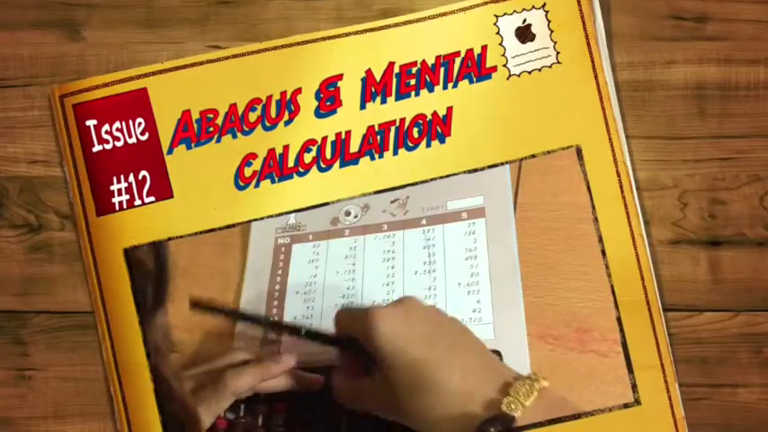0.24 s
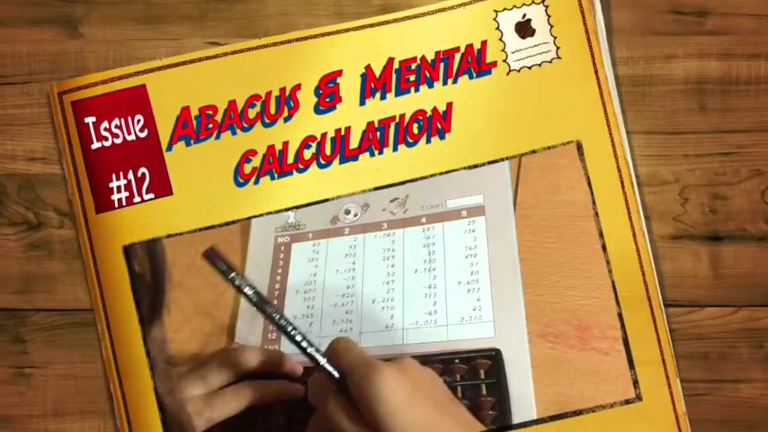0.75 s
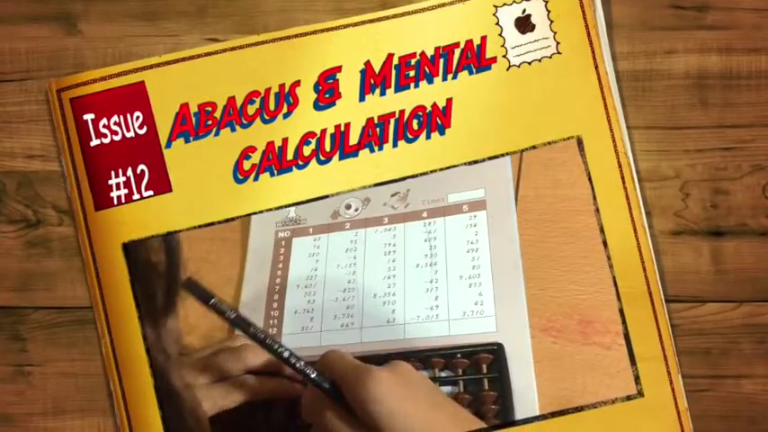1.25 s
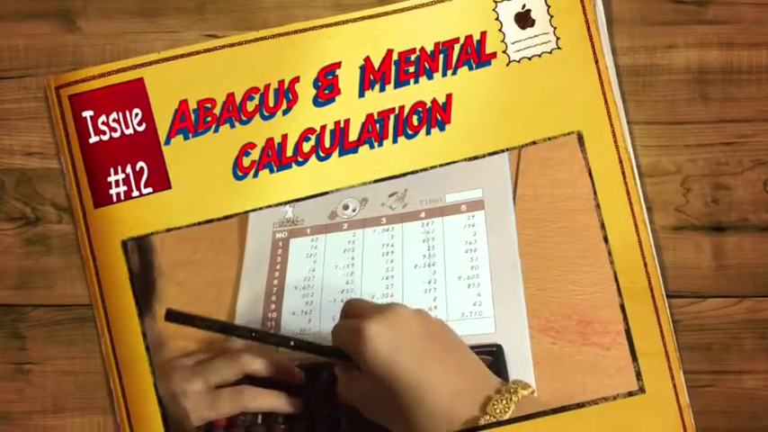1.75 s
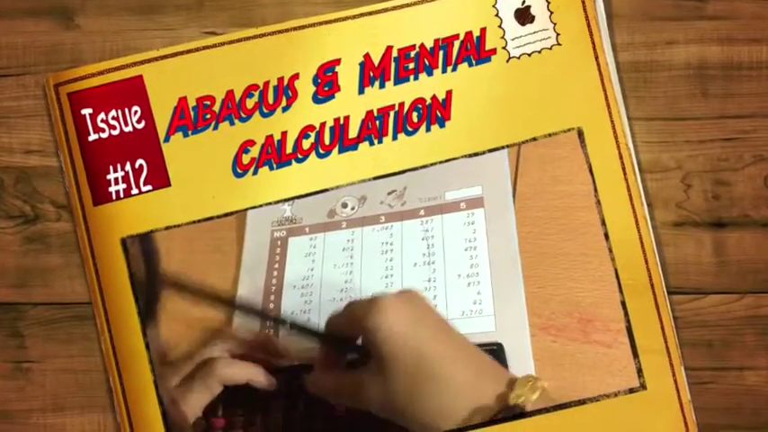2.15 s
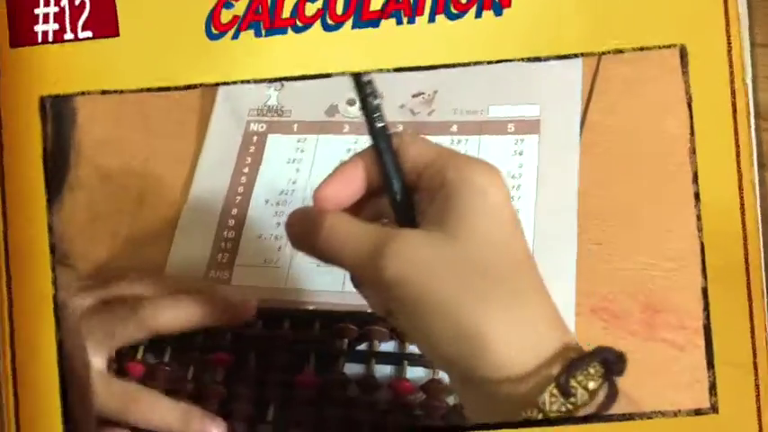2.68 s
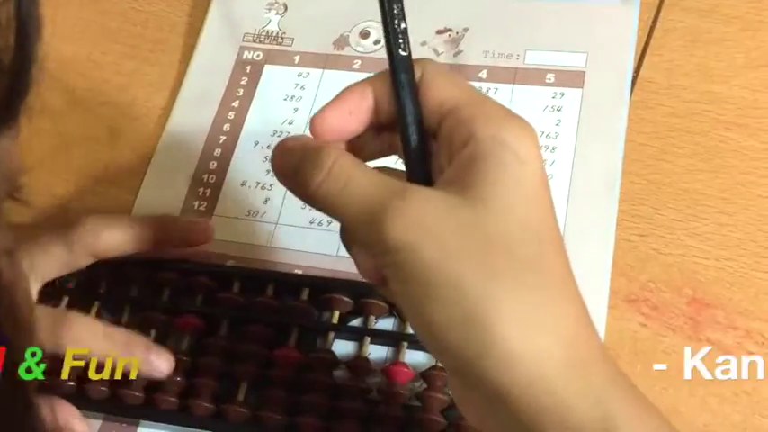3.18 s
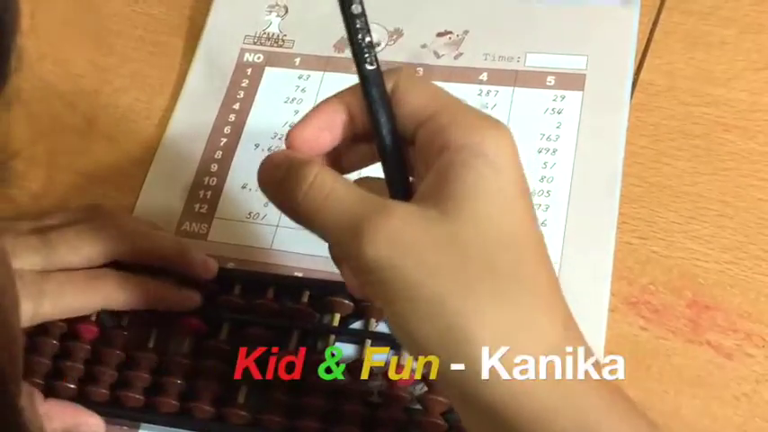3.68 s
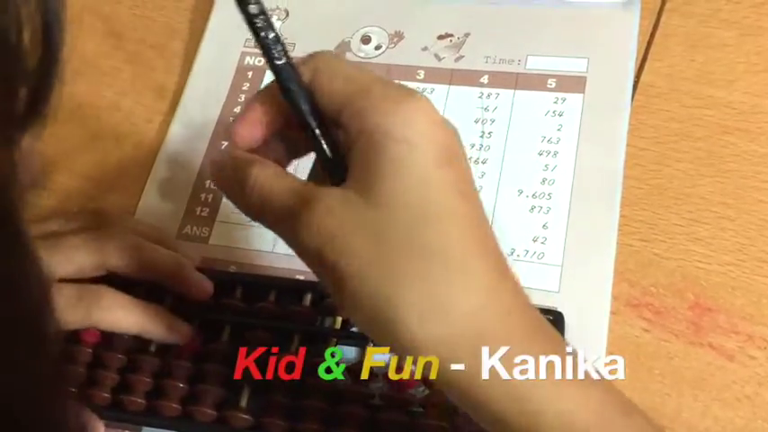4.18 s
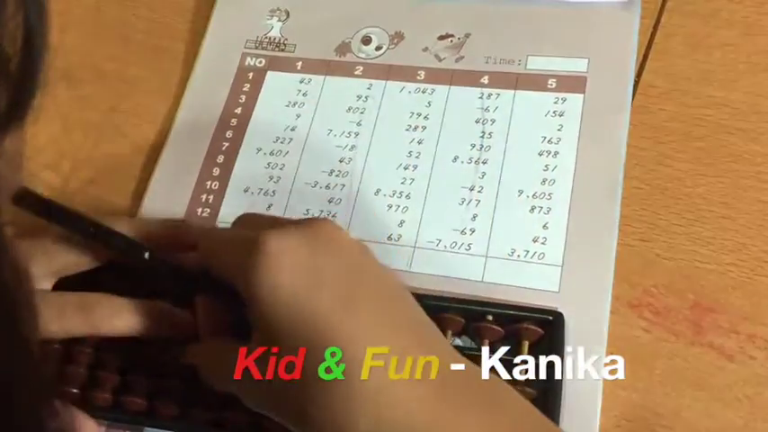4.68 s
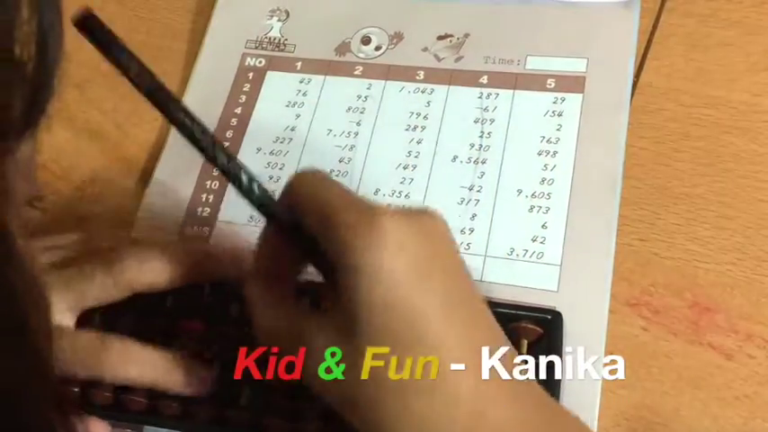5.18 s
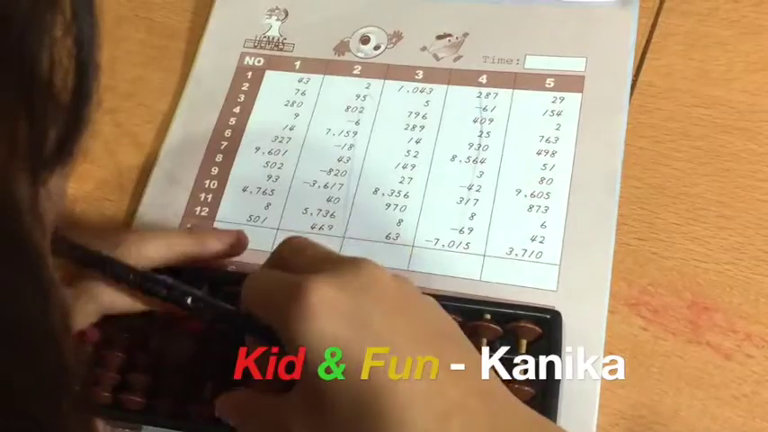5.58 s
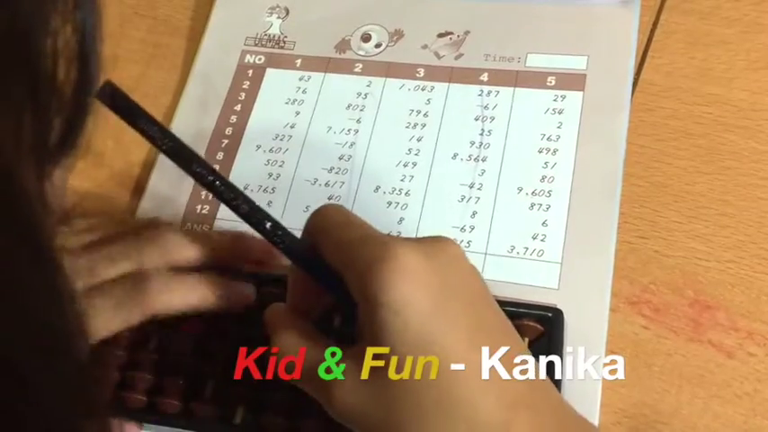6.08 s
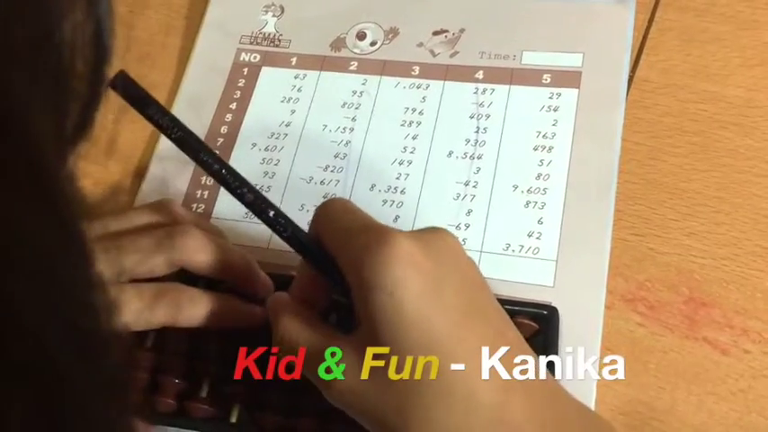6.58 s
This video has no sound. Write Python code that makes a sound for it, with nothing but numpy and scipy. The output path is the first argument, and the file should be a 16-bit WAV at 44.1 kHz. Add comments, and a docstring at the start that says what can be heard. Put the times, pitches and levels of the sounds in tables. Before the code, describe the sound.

A small furnished room heard close up, in mono, about seven seconds. A faint fan whines around 455 Hz with a gentle throb, over low hum, soft room noise and rumble. A fading rattle and desk bumps open; a bright bead clack snaps at 0.26, with small ticks following. Dull hand thuds continue, the strongest boom near 0.9. A very hard clack hits at 1.3 and rattles away; a double strike lands at 1.93, with lighter clicks until 2.2. Soft bumps come around 2.4, then mostly background with barely audible ticks until 3.7. Irregular clicks resume, stronger at 4.1, 4.4 and 4.65, with a sharp cluster at 4.9 to 5.0. Another dense clatter runs from 5.63 to 5.8. After a lull, a loud snap at 6.55 and a bright, knocking clack at 6.77 finish. Brief gritty scrapes lead into some strikes; echoes are short.

```python
"""A small furnished room: fingers flick hard beads along the rods of a small abacus on a desk, close by.
Each strike is a burst of noise shaped by the ringing of bead, rods and frame; gritty noise swells and fades.
A hand bumps the desk: a dull puff of noise and a long, low ring.
Behind it a fan whines and throbs as close sine tones, over steady hum tones, room noise and rumble."""
import sys
import numpy as np
from scipy import signal
from scipy.fft import rfft, irfft, next_fast_len
from scipy.io import wavfile
from scipy.ndimage import uniform_filter1d, map_coordinates

SR = 44100
rng = np.random.default_rng(int(sys.argv[2]) if len(sys.argv) > 2 else 0)


def transcribe(u):
    """Save the signal u as a 16-bit wav file named by the first command-line argument.

    u: samples, shape (n,) or (channels, n), limited to [-1, 1]; the rate is SR.
    q: integer samples, one column per channel.
    """
    v = np.clip(np.atleast_2d(u).T, -1, 1)
    q = np.round(v * 32767).astype(np.int16)
    wavfile.write(sys.argv[1], SR, q)


N = 301644  # length in samples


def amp(db):
    """Turn dB into a plain multiplier."""
    return 10 ** (np.asarray(db) / 20)


def unit(x):
    """Scale a sound to an rms of 1."""
    return x / np.sqrt(np.mean(x ** 2) + 1e-20)


def along(points, hz):
    """Read a curve of (Hz, value) points, joined by straight lines on a log frequency axis."""
    point_hz, values = np.transpose(points)
    return np.interp(np.log(hz + 1), np.log(point_hz + 1), values)


def filtered(x, response):
    """Multiply the spectrum of x by a response, a function of frequency in Hz."""
    m = next_fast_len(len(x) + 8192)
    hz = np.fft.rfftfreq(m, 1 / SR)
    return irfft(rfft(x, m) * response(hz), m)[:len(x)]


def causal(x, db):
    """Filter x by a gain in dB per FFT bin, with minimum phase so nothing sounds before its cause."""
    cepstrum = irfft(db * np.log(10) / 20)
    half = len(cepstrum) // 2
    cepstrum[1:half] *= 2
    cepstrum[half + 1:] = 0
    return irfft(rfft(x, len(cepstrum)) * np.exp(rfft(cepstrum)))


def noise(spectrum):
    """Coloured noise with an rms of 1."""
    return unit(filtered(rng.standard_normal(N), lambda hz: amp(along(spectrum, hz))))


def add(track, sound, start_s):
    """Mix a sound into the track at a time in seconds, cutting off what runs past the end."""
    rest = track[max(round(start_s * SR), 0):]
    rest[:len(sound)] += sound[:len(rest)]


def reverb(x):
    """Room echoes as a fresh noise tail in which each frequency dies away at its own speed."""
    # How fast the room falls silent. Each row: frequency in Hz, time to fall by 60 dB in seconds.
    decay_times = [(500, .35), (2500, .3), (7000, .3), (14000, 0.22)]
    hz, t, z = signal.stft(rng.standard_normal(SR // 3), SR, nperseg=256)
    fading = amp(-60 * t / along(decay_times, hz)[:, None])
    tail = signal.istft(z * fading, SR, nperseg=256)[1]
    delayed = np.pad(x, (300, 0))  # the echoes start 300 samples late
    return signal.fftconvolve(delayed, tail / np.linalg.norm(tail))


def ringing(hz, least, most):
    """Lift in dB from the abacus's modes: every contact wakes each by a random share, a little off pitch."""
    # Ways the abacus rings. Each row: centre in Hz, width in Hz, lift in dB before the random share.
    modes = [(1104, 190, 9), (1870, 120, 8), (2111, 120, 12.5), (2490, 47, 3.5), (3026, 250, 7.5),
             (4390, 200, 6.5), (4700, 200, -0.5), (5770, 210, 3), (5700, 230, 6), (6330, 86, -1),
             (6770, 450, 7.5), (7500, 200, -0.5), (8330, 180, 6), (9250, 520, 10), (12100, 360, 5.5),
             (13100, 600, 8.5)]
    detune = .015  # typical pitch error, as a fraction
    centre, width, lift_db = (column[:, None] for column in np.transpose(modes))
    share = rng.uniform(least, most, lift_db.shape)
    actual_hz = centre * (1 + detune * rng.standard_normal(centre.shape))
    peaks = 1 / (1 + (2 * (hz - actual_hz) / width) ** 2)
    return (lift_db * share * peaks).sum(axis=0)


def room_air():
    """Steady room noise, strongest in the bass."""
    # Colour of the noise. Each row: frequency in Hz, relative strength per Hz in dB.
    air_colour = [(20, -38), (30, -19.5), (45, -14), (100, -2), (136, -10.5), (250, -14.5), (320, -12.5),
                  (400, -19), (540, -21.5), (1080, -24.5), (2500, -31.5), (5000, -37.5), (10500, -41.5),
                  (13200, -42.5), (15500, -45.5)]
    return amp(-66.5) * noise(air_colour)


def rumble():
    """Low noise whose level wanders up and down in lumps, from 8 random values a second."""
    # Colour of the rumble. Each row: frequency in Hz, relative strength per Hz in dB.
    low_colour = [(20, -40.5), (40, -6.5), (75, 1), (130, -4), (300, -19), (600, -46)]
    lumps = map_coordinates(rng.standard_normal(80), [np.arange(N) * 8 / SR])
    return amp(-79.0 + 4.6 * lumps) * noise(low_colour)


def fan():
    """A motor whine with a weaker tone on either side, which beat as a throb once per turn, and hum."""
    # The drifting whine. Each row: time in seconds, pitch in Hz.
    whine_pitch = [(0, 454.3), (1.4, 455.7), (2.4, 455.7), (5.2, 454.2), (6.84, 454)]
    # The steady hum tones. Each row: frequency in Hz, rms level in dB.
    hum_tones = [(100, -75.5), (164, -83.5), (200, -81.5), (210, -87), (277, -85), (300, -85), (303, -83),
                 (500, -74)]
    t = np.arange(N) / SR
    cycles = np.cumsum(np.interp(t, *np.transpose(whine_pitch))) / SR
    turn = cycles / 35.81 - .21  # 35.81 whine cycles per turn
    whine = amp(-63.5) * np.sin(2 * np.pi * cycles)
    whine += amp(-71.5) * np.sin(2 * np.pi * (cycles + turn))
    whine += amp(-77.5) * np.sin(2 * np.pi * (cycles - turn))
    hum = np.zeros(N)
    for hz, rms_db in hum_tones:
        hum += np.sqrt(2) * amp(rms_db) * np.sin(2 * np.pi * (hz * t + rng.random()))
    return whine + hum


def desk():
    """A hand's soft bump gives a dull puff of noise plus the long low ring of the desk top."""
    # The bumps. Each row: start in seconds, boom level in dB, thud level in dB, thud pitch in Hz.
    bumps = [(0.031, -64, -63.5, 152), (0.158, -59.5, -80, 200), (.445, -69, -65, 200),
             (0.476, -71, -60.5, 250), (.505, -74.5, -66.5, 730), (0.521, -67, -60.5, 211),
             (0.799, -74, -64.5, 350), (.815, -68, -66.5, 730), (.85, -67.5, -59.5, 73),
             (.9, -73, -63, 298), (.922, -49.5, -56.5, 153), (1.312, -65, -76.5, 250),
             (1.951, -60, -69, 250), (2.37, -71.5, -72, 377), (2.431, -64, -59.5, 190),
             (4.77, -71, -65.5, 61), (4.919, -64, -61.5, 75.6), (5.329, -62.5, -74.5, 150),
             (5.702, -62, -73, 198), (6.386, -62, -69, 150), (6.553, -59.5, -64, 248)]
    # Tones of the boom. Each row: frequency in Hz, level within the boom in dB, time to fall 60 dB in s.
    boom_tones = [(112.9, -6, 3.9), (111.35, -1, .45)]
    out, t = np.zeros(N), np.arange(2 * SR) / SR
    boom = np.zeros(len(t))
    for hz, db, t60 in boom_tones:
        boom += amp(db - 60 * t / t60) * np.sin(2 * np.pi * hz * t)
    boom *= 1 - np.exp(-t / 0.0018)  # soft start
    puff_t = t[:SR // 4]
    puff_shape = amp(-60 * puff_t / 0.14) * (1 - np.exp(-puff_t / 0.0053))
    for start_s, boom_db, thud_db, thud_hz in bumps:

        def thud_band(hz):
            """A broad resonance, passed twice."""
            once = 1j * hz * .8 * thud_hz / (thud_hz ** 2 - hz ** 2 + 1j * hz * 0.77 * thud_hz)
            return once ** 2

        puff = filtered(rng.standard_normal(len(puff_t)) * puff_shape, thud_band)
        add(out, amp(thud_db) * puff / np.std(puff[:SR // 30]), start_s)
        add(out, amp(boom_db) * boom, start_s)
    return out


def gritty_noise():
    """Rough noise of uneven loudness, in short swells leading into strikes and in fading rattles."""
    # Short swells of gritty noise leading into a strike.
    # Each row: end in seconds, length in seconds, end level in dB.
    swells = [(0.262, 0.039, -59), (1.308, 0.023, -57), (1.917, .06, -71.5), (2.132, 0.055, -62),
              (4.086, 0.035, -66), (4.649, 0.05, -67), (4.915, 0.032, -61.5), (5.687, .033, -62.5),
              (6.465, 0.017, -68), (6.548, .022, -58.5), (6.772, 0.046, -58)]
    # Fading rattles: the tail of an earlier strike at the start, and one after the strike at 1.31 s.
    # Each row: start in seconds, starting level in dB, brightness in dB per octave.
    rattles = [(0, -63, -3), (1.319, -65, 2.5)]
    # Colour of the grit. Each row: frequency in Hz, relative strength per Hz in dB.
    grit_colour = [(590, -35.5), (1000, -2), (1800, -3), (2970, -4.5), (5790, -7), (7770, -13.5),
                   (13200, -18.5), (15000, -24.5)]
    swell_db, swell_tilt_db = 11, 1.5  # rise along a swell; brightness per octave
    rattle_s, fade_db = .11, 15.5  # length of a rattle; its fall in level
    out = np.zeros(N)
    strokes = []
    for end, length, db in swells:
        strokes.append((end - length, length, db - swell_db, db, swell_tilt_db))
    for start, db, tilt_db in rattles:
        strokes.append((start, rattle_s, db, db - fade_db, tilt_db))
    for start, length, start_db, end_db, tilt_db in strokes:
        n = round(length * SR)
        uneven = amp(2.2 * unit(uniform_filter1d(rng.standard_normal(n), size=60)))

        def colour(hz):
            """Grit colour, tilted in brightness, with the abacus ringing along."""
            tilt = tilt_db * np.log2((hz + 50) / 3000)
            return amp(along(grit_colour, hz) + tilt + ringing(hz, .3, 1.1))

        grit = unit(uneven * filtered(rng.standard_normal(n), colour))
        soft_start = np.minimum(np.arange(n) / (.004 * SR), 1)  # over 4 ms
        add(out, soft_start * grit * amp(np.linspace(start_db, end_db, n)), start)
    return out


def contact_noise(t, chatter_db):
    """A sharp crack, then a longer chatter as the struck beads knock on against their neighbours."""
    crack = amp(-60 * t / .009) * (1 - np.exp(-(t / .0006) ** 2)) * rng.choice([-1, 1], len(t))
    chatter = amp(chatter_db - 60 * t / 0.034) + amp(-29.0 - 60 * t / 0.086)
    uneven = amp(2.5 * unit(uniform_filter1d(rng.standard_normal(len(t)), size=40)))
    chatter_start = 1 - np.exp(-t / 0.00082)
    blows = crack + chatter * uneven * rng.standard_normal(len(t)) * chatter_start
    blows /= np.sqrt(np.mean(blows[:SR // 250] ** 2))
    # level out the random spectrum of the noise burst, so the colour set later decides the tone
    power = np.abs(rfft(blows, 8192)) ** 2
    flatten_db = -10 * np.log10(uniform_filter1d(power, size=260) / power.mean())
    return causal(blows, flatten_db)[:len(t)]


def beads():
    """Each strike is a crack and a short chatter, coloured by bead, rods and frame, with room echoes."""
    # The strikes. Each row: start in seconds, bead level in dB before a common 1.5 dB lift, bead pitch in Hz,
    # then, in dB against the bead, the dull knock of rods and frame and the bright edge.
    strikes = [(0.2586, -36, 4960, 5, 6), (0.3085, -51, 5300, 8, -3), (0.319, -61, 4800, 11, -11),
               (0.3497, -47, 5000, -3, -16.5), (1.1145, -62, 4300, -1, -14), (1.3059, -50, 5500, -7, -4),
               (1.3073, -23.5, 6200, -6.5, -6.5), (1.347, -47, 4870, -0.5, -6),
               (1.3867, -54.5, 5300, 1, -10), (1.4142, -51, 4600, 5, -14), (1.424, -61, 4400, 13.5, -10),
               (1.9179, -50, 5100, 11.5, -10), (1.9318, -33, 4930, -10, -4),
               (1.9493, -28.5, 5270, -7.5, -11.5), (2.0798, -57.5, 4200, -1, -19),
               (2.092, -56, 4300, 3, -22), (2.112, -54, 4900, 2, -23), (2.1303, -46.5, 5700, 5.5, -8.5),
               (2.17, -42, 5100, -6, -17), (2.822, -71.5, 3400, 4.5, -20), (3.0874, -61, 4500, -0.5, -17.5),
               (3.6827, -67.5, 3600, 3.5, -13), (3.7099, -42, 4900, -8.5, -14),
               (3.725, -47.5, 4980, -2.5, -15.5), (3.924, -51, 5100, 1, -11.5),
               (3.9278, -48, 5100, -5, -10), (3.9358, -50.5, 5000, 3, -12), (4.087, -56.5, 5300, 12, -7),
               (4.0895, -37.5, 5380, -4.5, -5.5), (4.096, -47.5, 5200, 4.5, -16.5),
               (4.3582, -49, 5600, 1.5, -11.5), (4.3798, -41, 5600, -8.5, -11.5),
               (4.393, -47, 5500, -4.5, -16), (4.6486, -41.5, 5500, -2, -9.5),
               (4.9136, -33.5, 4900, -4.5, -3.5), (4.9374, -31, 6130, -11, -11),
               (4.965, -48, 5400, 0, -8.5), (5.0022, -53, 3800, 7.5, -15), (5.0069, -44, 4900, -10, -12),
               (5.013, -51, 4400, -1, -13), (5.321, -71, 5000, -5, -14), (5.44, -46.5, 4900, -6, -14),
               (5.5447, -54.5, 6300, 8, -0.5), (5.6322, -57.5, 3800, 2.5, -18),
               (5.6415, -50.5, 4320, -2.5, -22), (5.6912, -33.5, 5700, -7.5, -2),
               (5.716, -41, 5100, -1, -2), (5.719, -38, 4800, 0.5, -8), (5.7521, -52, 4900, -11, -16),
               (5.765, -55, 5000, -6, -22), (5.7712, -41, 5650, -6, -16), (5.7781, -42.5, 4900, -1, -12),
               (5.787, -42, 5600, -5, -15.5), (6.4637, -60, 4300, 4, -15.5), (6.5262, -49, 4240, -0.5, -20),
               (6.5369, -54, 4600, 13, -20), (6.5514, -23.5, 5560, -12, 0.9),
               (6.7288, -65, 4500, 11.5, -14), (6.744, -54.5, 4700, -5, -18), (6.7735, -35.5, 5570, 9, 10)]
    usual_db = -40  # a strike of middling force
    out, t, hz = np.zeros(N), np.arange(SR // 10) / SR, np.fft.rfftfreq(8192, 1 / SR)
    for start_s, bead_db, pitch_hz, rods_db, edge_db in strikes:
        force_db = bead_db - usual_db
        frame_db = -6.5 + 1.4 * rods_db + .4 * force_db  # the frame follows the knock and the force
        tick_db = -9 + .7 * edge_db + .35 * rods_db  # the highest tick follows the edge and the knock
        chatter_db = -11.5 - .15 * force_db  # harder strikes stand further above their chatter
        body = [(150, frame_db - 37), (600, 1.3 * frame_db - 10), (850, frame_db),
                (1100, frame_db + 4.5), (1400, frame_db + 0.5), (2300, rods_db + 1.5), (pitch_hz, 0),
                (9000, edge_db), (10500, edge_db - 5.5), (13500, tick_db), (20000, tick_db - 9.5)]
        body_db = along(body, hz)
        modes_db = ringing(hz, .15, 1.21)
        clack_db = 5 * np.exp(-(np.log((hz + 1) / pitch_hz) / 0.24) ** 2)  # the bead's own broad clack
        blows = amp(bead_db + 1.5) * contact_noise(t, chatter_db)
        add(out, causal(blows, body_db + clack_db + modes_db), start_s)
        # the walls hear all directions, so the modes even out
        add(out, amp(-15) * reverb(causal(blows, body_db)), start_s)
    return out


def scene():
    """Mix all the layers into one channel."""
    background = room_air() + rumble() + fan()
    return (background + desk() + gritty_noise() + beads())[None]


def record(dry):
    """Drop the top treble by 22 dB around 15300 Hz and keep nothing from 16400 Hz up."""
    top_hz, shelf_hz = 16400, 15300

    def response(hz):
        """The shelf slides down over 250 Hz."""
        shelf_db = -22 * np.clip((hz - shelf_hz) / 250 + .5, 0, 1)
        return (hz < top_hz) * amp(shelf_db)

    return filtered(dry[0], response)[None]


dry = scene()
out = record(dry)
transcribe(out)
```